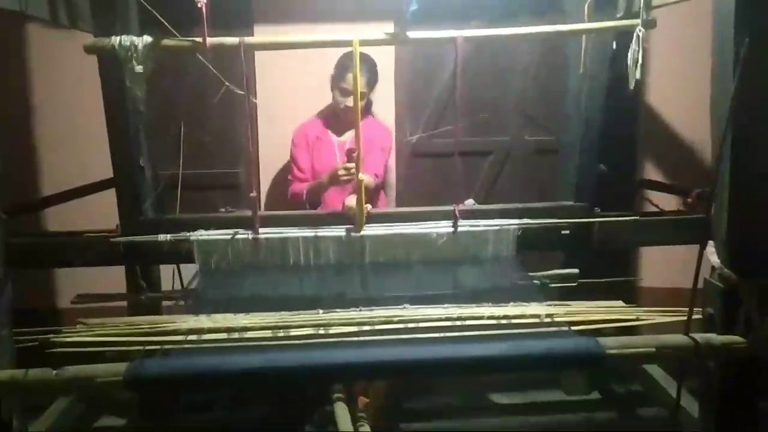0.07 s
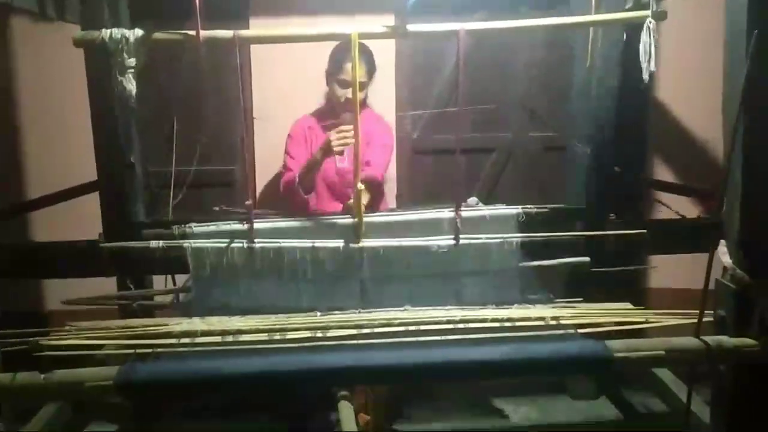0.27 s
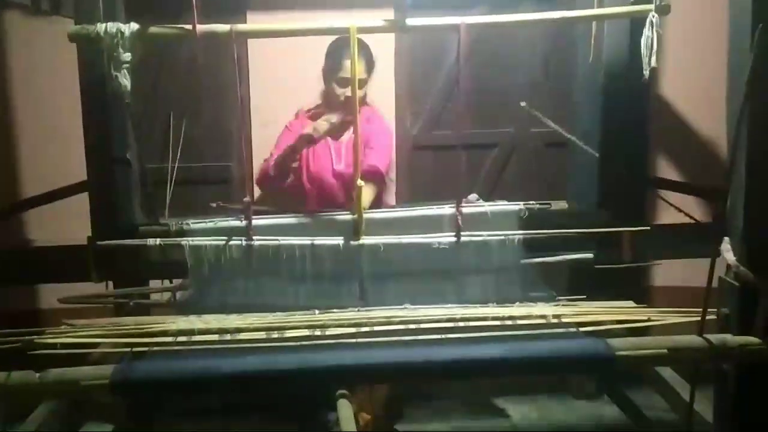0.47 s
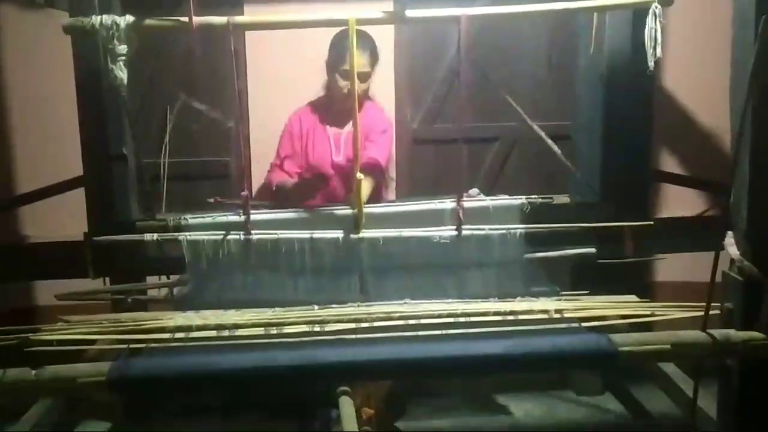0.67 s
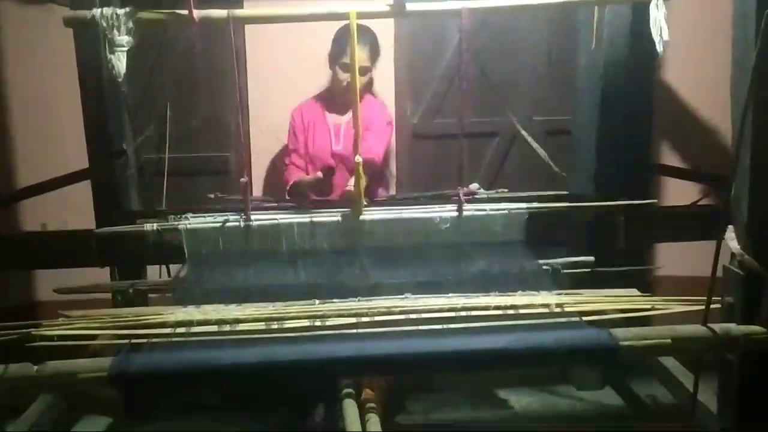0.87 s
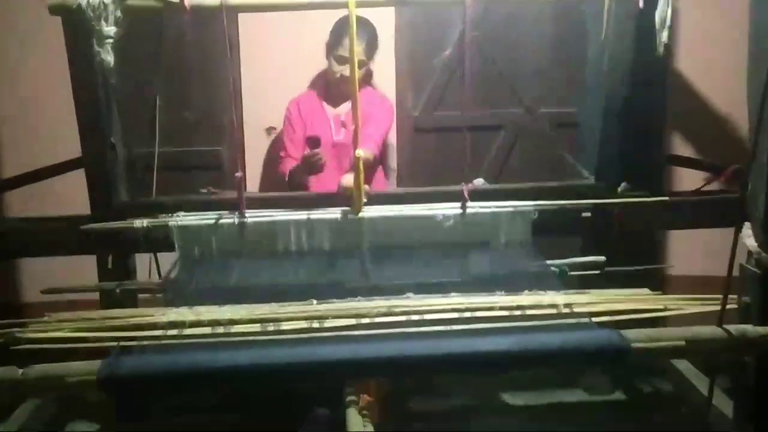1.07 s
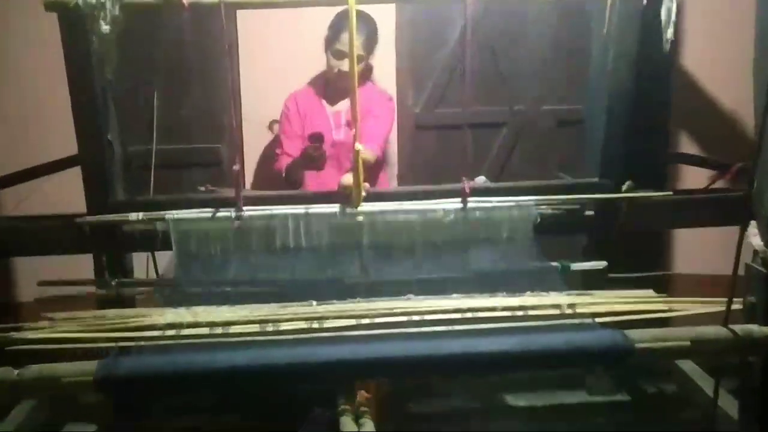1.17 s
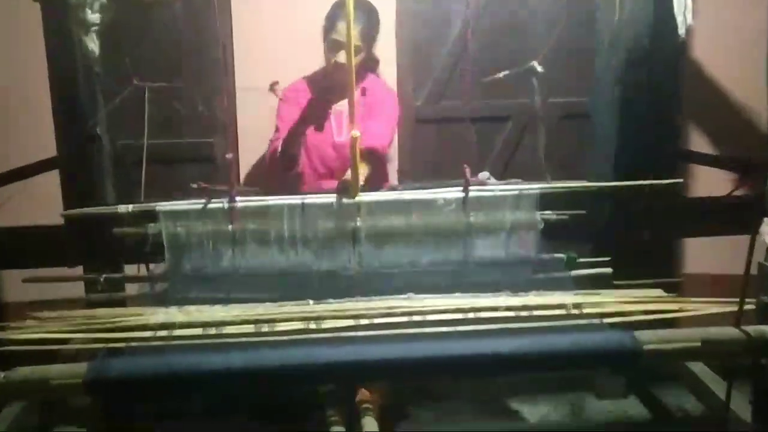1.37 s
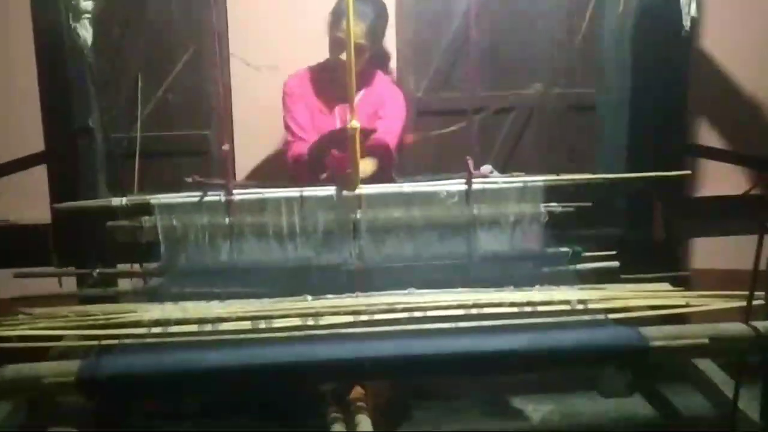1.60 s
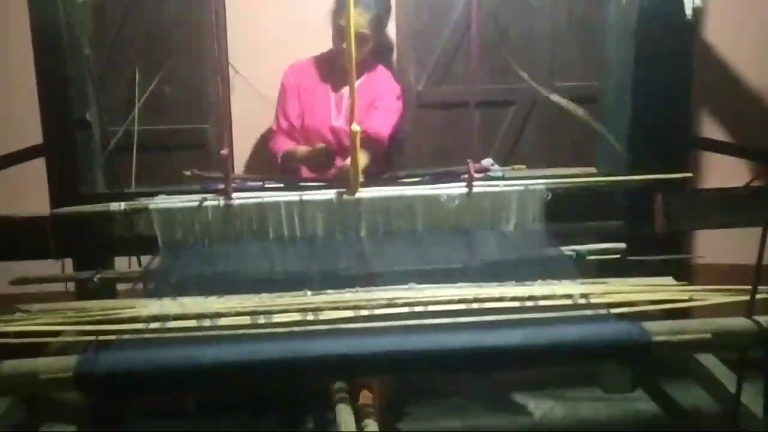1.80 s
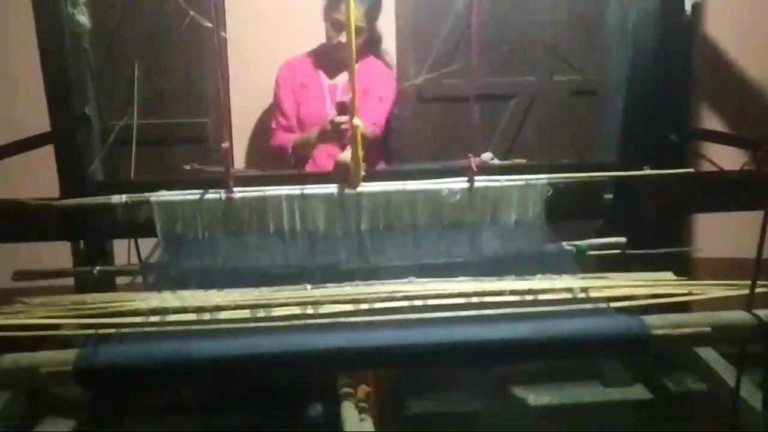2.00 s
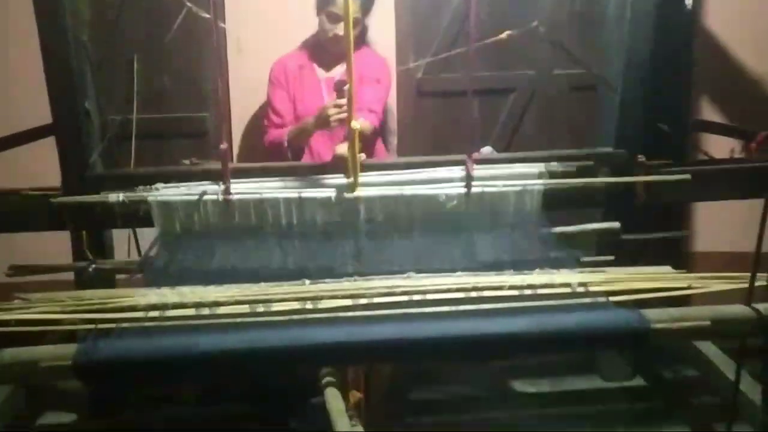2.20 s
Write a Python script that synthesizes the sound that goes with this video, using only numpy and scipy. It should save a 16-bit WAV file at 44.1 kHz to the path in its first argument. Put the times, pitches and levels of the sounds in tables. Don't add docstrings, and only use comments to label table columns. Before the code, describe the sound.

A wooden handloom in a hard room, heard a few metres away. Faint scraping leads to the loudest shuttle slam at 0.24 s, with pegs rattling after. Soft bumps and knocks cluster at 0.48-0.65, then light ticks near 0.85-1.05. A sharp far slam lands at 1.3, a faint snap at 1.46, a heavy beat at 1.6 with rebounds to 1.73, and bouncing knocks and sliding at 1.82-2.04. Quiet air and low rumble continue underneath.

```python
import sys
import numpy as np
from scipy import signal
from scipy.fft import rfft
from scipy.io import wavfile
from scipy.ndimage import uniform_filter1d

SR = 44100
rng = np.random.default_rng(int(sys.argv[2]) if len(sys.argv) > 2 else 0)


def store_pcm(level_fs):
    pcm = np.round(np.clip(level_fs, -1, 1) * 32767).astype(np.int16)
    wavfile.write(sys.argv[1], SR, np.atleast_2d(pcm).T)


def invert_db(level):
    return 10 ** (np.asarray(level, dtype=float) / 20)


N = 99225
LEAD = 4410
BINS_HZ = np.fft.rfftfreq(4096, 1 / SR)


def evened(x):
    return x / np.sqrt(np.sum(x ** 2) + 1e-20)


def read(points, hz):
    f, value = np.transpose(points)
    return np.interp(np.log(hz + 1), np.log(f + 1), value)


def panned(sound, left_db, right_db=0.0):
    return sound * invert_db(np.array([[left_db], [right_db]]))


def add(mix, s, sound):
    part = mix[:, LEAD + round(s * SR):][:, :sound.shape[1]]
    part += sound[:, :part.shape[1]]


def causal(db):
    log = np.log(invert_db(np.maximum(db, -100)))
    mirrored = np.r_[log, log[-2:0:-1]]
    return np.fft.ifft(np.exp(np.conj(signal.hilbert(mirrored)))).real[:2048]


def pair(shape_db, size):
    # frequency in Hz, left-right likeness from -1 to 1
    likeness = [(60, 0.62), (180, 1), (550, 1), (1650, 0.086), (4970, -0.14), (15000, 0.0025)]
    hz = np.fft.rfftfreq(size, 1 / SR)
    a, b, c, d = rng.standard_normal((4,) + shape_db.shape)
    same = np.clip(read(likeness, hz), -1, 1)[:, None]
    left = a + 1j * b
    right = same * left + np.sqrt(1 - same ** 2) * (c + 1j * d)
    z = np.array([left, right]) * invert_db(shape_db)
    return signal.istft(z, nperseg=size, noverlap=size * 3 // 4)[1]


def room(x):
    # frequency in Hz, time to fall 60 dB in seconds
    decay = [(150, 0.76), (400, 0.57), (1000, 0.51), (2800, 0.43), (7000, 0.3), (14000, 0.35)]
    build_s, direct_db = 0.00073, -11
    early_db, early_s = -5.5, 0.0039
    t = (np.arange(440) - 8) * 64 / SR
    t60 = read(decay, np.fft.rfftfreq(256, 1 / SR))[:, None]
    tail = pair(-60 * t / t60, size=256)[:, 512:]
    u = np.arange(tail.shape[1]) / SR
    tail = tail * (1 - np.exp(-u / build_s)) * (1 + invert_db(early_db) * np.exp(-u / early_s))
    tail = tail / np.linalg.norm(tail, axis=1)[:, None]
    wet = signal.fftconvolve(x, tail, axes=1)
    return wet[:, :x.shape[1]] + invert_db(direct_db) * x


def blow(row, tone, modes, contact_s):
    s, db, body_db, treble_db, pan_db = row
    detune, body_hz, treble_hz, evening, loud_db = 0.029, 1660, 5860, 0.69, 26
    hz = BINS_HZ
    t = np.arange(2048) / SR
    crunch = rng.standard_normal(2048) * np.exp(-t / contact_s)
    ripple = abs(rfft(evened(crunch), 4096))
    gain = np.ones(len(hz))
    for (f_hz, mode_db, t60), r in zip(modes, rng.standard_normal(len(modes))):
        off_hz = hz - f_hz * (1 + detune * r)
        gain = gain + invert_db(mode_db) / np.sqrt(1 + (off_hz * t60 / 0.52) ** 2)
    body = body_db / (1 + (hz / body_hz) ** 4)
    treble = treble_db / (1 + (treble_hz / (hz + 1)) ** 4) / (1 + (hz / treble_hz / 2) ** 10)
    colour_db = read(tone, hz) + 20 * np.log10(gain / (ripple + evening)) + body + treble
    sound = evened(np.convolve(crunch, causal(colour_db)))
    return s, panned(sound * invert_db(db + loud_db), pan_db)


def strike(places, rows, tone, modes, contact_s):
    for k, row in enumerate(rows):
        add(places[k % 4], *blow(row, tone, modes, contact_s))


def shuttle(places):
    # start in seconds, peak in dB, low body in dB, treble in dB, left over right in dB
    slams = [
        (0.233, -7, -16.5, 13, -4.5),
        (0.2375, 1, 6.5, 12.5, -6.5),
    ]
    bounces = [
        (0.597, -27, 11, -7, 1),
        (1.848, -15.5, 10, -11, -5.5),
        (1.8875, -13, 4, -1.5, -4),
    ]
    touch = [
        (0.2112, -9, 1.5, 0, -6.5),
    ]
    far_slams = [
        (1.2935, -29, 1, 14, 9.5),
        (1.297, -6.5, 3, 7.5, -8),
    ]
    # frequency in Hz, level in dB
    wood_tone = [(35, -58), (60, -31), (305, -22.5), (368, -24.5), (869, -6), (3270, 0), (3930, 0.5),
                 (9740, -15.5), (15500, -29)]
    # mode in Hz, level over the crunch in dB, time to fall 60 dB in seconds
    slam_modes = [(392, 12.5, 0.059), (879, 1, 0.16), (2940, 1.5, 0.027), (3900, 1.5, 0.0051),
                  (4500, 0.5, 0.0047)]
    bounce_modes = [(2650, 5.5, 0.04), (3780, 10.5, 0.0088), (4970, 6.5, 0.0041)]
    touch_modes = [(1050, 6, 0.017), (1680, 8, 0.0086), (2590, 8, 0.026)]
    far_modes = [(920, -2, 0.044), (4200, 6.5, 0.0034), (7100, -17, 0.012)]
    strike(places, slams, wood_tone, slam_modes, contact_s=0.002)
    strike(places, bounces, wood_tone, bounce_modes, contact_s=0.002)
    strike(places, touch, wood_tone, touch_modes, contact_s=0.002)
    strike(places, far_slams, wood_tone, far_modes, contact_s=0.002)


def beater(places):
    # start in seconds, peak in dB, low body in dB, treble in dB, left over right in dB
    knocks = [(0.559, -20, 1, -10, -2.5), (0.562, -15, 17, 0.5, -6.5), (0.588, -13.5, 0, -17.5, -17),
              (0.605, -23.5, -1, 9, -4.5), (0.624, -30, -6, 17, -11), (1.202, -26, 7.5, -15, -6.5),
              (1.231, -28, 5.5, -0.5, -8.5), (1.546, -23, 7, -4, -3), (1.581, -14.5, 6.5, -15, -5.5),
              (1.623, -19.5, 5, 0, -3), (1.939, -18, 7.5, 0.5, -9),
              (-0.035, -14, 0.0043, 0.012, -7),
    ]
    beats = [
        (1.5925, -13, 1, 11, -4),
        (1.5965, -7, 0.5, -1, -5),
        (1.651, -28, 25, -12, -8),
        (1.679, -19.5, 3.5, 1, -3),
        (1.723, -18.5, 5.5, 6, -6.5),
    ]
    # frequency in Hz, level in dB
    beater_tone = [(35, -64), (60, -33.5), (335, -16), (497, -18), (1050, -2.5), (2310, -3), (3670, -0.5),
                   (9080, -7.5), (15500, -28.5)]
    # mode in Hz, level over the crunch in dB, time to fall 60 dB in seconds
    knock_modes = [(813, 2.2, 0.034), (1038, 0.83, 0.19), (3924, 0.71, 0.18), (4740, 1.4, .01)]
    beat_modes = [(1000, 0, 0.023), (1193, 0.5, 0.012), (2950, -6, 0.022), (4200, 1.5, 0.0045)]
    strike(places, knocks, beater_tone, knock_modes, contact_s=0.003)
    strike(places, beats, beater_tone, beat_modes, contact_s=0.003)


def treadles(places):
    # start in seconds, peak in dB, low body in dB, treble in dB, left over right in dB
    bumps = [(0.475, -28, -3.5, 15, -3), (0.488, -25, -8, 15, -8), (0.496, -23, -16.5, 13, -3.5),
             (1.816, -24.5, -14, 9, -6), (1.828, -22.5, -7.5, 22, -2), (2.019, -33.5, -10, 0, -4),
             (2.032, -30, 32, 4, -5.5)]
    # frequency in Hz, level in dB
    bump_tone = [(59, -21), (100, -15.5), (564, -8), (808, 1.5), (1690, -3), (3000, -2.5), (6000, -22),
                 (9150, -49), (15500, -37)]
    # mode in Hz, level over the crunch in dB, time to fall 60 dB in seconds
    bump_modes = [(423, 12, 0.01), (810, 5.5, 0.068)]
    strike(places, bumps, bump_tone, bump_modes, contact_s=0.004)


def rods_and_cords(places):
    # start in seconds, peak in dB, low body in dB, treble in dB, left over right in dB
    ticks = [(.187, -46, 1, 2, -3), (.72, -53, -2, -7, -18), (.832, -40, -17, 12, -14),
             (.865, -33, -8.5, 12.5, -7), (1.0, -39, -24, -5, -9), (1.042, -37, 7, 13, -7),
             (1.047, -28, -7, 10.5, -8), (1.065, -38, -13, 6, -22), (1.277, -27, -4, 0, -5)]
    snaps = [
        (1.44, -31, 0, -4, -19),
        (1.4585, -23, 4, -23, -7),
        (1.473, -30, -4, -7, -9),
    ]
    # frequency in Hz, level in dB
    tick_tone = [(120, -43), (200, -40), (940, -2), (1350, -7.5), (1480, -16.5), (2090, -7), (5490, -11),
                 (15500, -28)]
    snap_tone = [(180, -43), (300, -26), (953, -28), (2880, -11), (4650, 14.5), (9450, 15), (15500, -8)]
    # mode in Hz, level over the crunch in dB, time to fall 60 dB in seconds
    tick_modes = [(1569, 29, 0.22), (4330, 3, 0.02), (5480, 1.9, 0.043)]
    snap_modes = [(9430, 22, 0.002)]
    strike(places, ticks, tick_tone, tick_modes, contact_s=0.003)
    strike(places, snaps, snap_tone, snap_modes, contact_s=0.002)


def loom():
    places = np.zeros((4, 2, N + LEAD))
    shuttle(places)
    beater(places)
    treadles(places)
    rods_and_cords(places)
    return sum(room(p) for p in places)[:, LEAD:]


def rattles():
    # start in seconds, peak in dB, pitch in Hz, time to fall 60 dB in seconds
    rings = [(0.211, -33, 2590, 0.045), (0.2367, -5, 4210, 0.03), (0.25, -5, 4200, 0.016),
             (0.255, -11, 2830, 0.022), (0.261, -17, 4300, .025), (0.282, -23, 3970, 0.025),
             (0.298, -14.5, 3980, 0.037), (0.309, -13, 3900, .03), (.320, -14, 4080, .03),
             (.327, -17, 4030, 0.025), (0.5603, -19.5, 4800, 0.033), (0.569, -20, 990, 0.036),
             (.589, -19, 4900, .02), (.593, -20.5, 790, 0.033), (0.5972, -13.5, 3747, 0.048),
             (.616, -17.5, 3520, 0.053), (0.655, -20, 3880, 0.031), (1.299, -11, 4190, 0.018),
             (1.324, -12, 4200, 0.016), (1.6, -12.5, 2950, .02), (1.610, -20, 1050, 0.034),
             (1.652, -7, 1050, 0.034), (1.683, -18.5, 4200, 0.044), (1.730, -24, 1100, .04),
             (1.745, -25.5, 1164, 0.034), (1.848, -17, 3630, 0.045), (1.848, -24, 918, 0.063),
             (1.8855, -9.5, 4200, .012), (1.889, -22.5, 3810, 0.093), (1.887, -27, 2650, 0.042),
             (1.924, -17, 3160, 0.033), (1.943, -22, 1384, 0.036), (1.905, -21, 3680, 0.05),
             (2.022, -26, 790, 0.037), (2.040, -23, 870, 0.069)]
    split, rise_s, left_db, room_db = 0.068, 0.0002, -11, -14
    out = np.zeros((2, N + LEAD))
    t = np.arange(4000) / SR
    for s, db, hz, t60 in rings:
        offset, phase = rng.random(2)
        second_hz = hz * (1 + split * (2 * offset - 1))
        ring = np.sin(2 * np.pi * hz * t) + 0.54 * np.sin(2 * np.pi * (second_hz * t + phase))
        ring = ring * invert_db(db - 60 * t / t60) * (1 - np.exp(-t / rise_s))
        add(out, s, panned(ring, left_db))
    return (out + invert_db(room_db) * room(out))[:, LEAD:]


def thumps():
    # start in seconds, level in dB, pitch in Hz
    rings = [(0.241, -45, 75), (0.239, -30, 180), (0.562, -37, 103), (0.652, -40, 66), (1.595, -59, 61),
             (1.852, -38.5, 184), (1.902, -35.5, 61), (1.943, -41, 97)]
    t60, rise_s = 0.16, 0.00092
    out = np.zeros((2, N + LEAD))
    t = np.arange(SR // 3) / SR
    for s, db, hz in rings:
        ring = np.sin(2 * np.pi * hz * t) * invert_db(db - 60 * t / t60) * (1 - np.exp(-t / rise_s))
        add(out, s, panned(ring, -5.0))
    return out[:, LEAD:]


def slide():
    # time in seconds, level in dB
    stroke = [(0, -41.5), (.465, -47), (.495, -32), (0.539, -40.5), (.63, -32), (.75, -47), (.88, -42.5),
              (.97, -54.5), (1.079, -39), (1.17, -93), (1.26, -62), (1.45, -46), (1.57, -42.5),
              (1.805, -46), (1.84, -28), (1.93, -35), (2.101, -36.5), (2.25, -52)]
    # frequency in Hz, level in dB
    scrape_tone = [(59, -80), (100, -10), (275, -9.5), (1040, -14.5), (2000, -13.5), (3120, -9.5),
                   (4660, -5), (10200, -11.5), (15500, -34.5)]
    slips_per_s = 1100
    happens = rng.random(N) < slips_per_s / SR
    strength = invert_db(np.minimum(3.5 * rng.exponential(1, N), 10))
    slips = happens * strength * rng.choice([-1., 1.], N)
    sound = signal.oaconvolve(slips, causal(read(scrape_tone, BINS_HZ)))[:N]
    s, db = np.transpose(stroke)
    sound = evened(sound) * np.sqrt(N) * invert_db(np.interp(np.arange(N) / SR, s, db))
    return room(panned(sound, -6.0))


def air():
    # frequency in Hz, level in dB
    air_tone = [(12, -26), (20, 7), (76, 8), (581, -31), (881, 0), (1300, -45), (1450, -15), (4430, -15),
                (15500, -20.5)]
    air_db, rumble_hz, rumble_db = -56.5, 63.1, -58
    shape_db = read(air_tone, np.fft.rfftfreq(2048, 1 / SR))[:, None] + np.zeros(N // 512 + 5)
    noise = pair(shape_db, size=2048)[:, :N]
    drift_hz = 300 * uniform_filter1d(rng.standard_normal(N), 3000)
    turns = np.cumsum(rumble_hz + drift_hz) / SR
    rumble = invert_db(rumble_db) * np.sin(2 * np.pi * turns)
    return panned(evened(noise) * np.sqrt(2 * N) * invert_db(air_db) + rumble, -2.5, 1.5)


def scene():
    return loom() + rattles() + thumps() + slide() + air()


def capsule(x):
    shelf_db, edge_hz, bass_cut_hz = 2.5, 11000, 32
    treble = shelf_db / (1 + (edge_hz / (BINS_HZ + 1)) ** 16)
    bass = -30 / (1 + (BINS_HZ / bass_cut_hz) ** 4)
    return signal.oaconvolve(x, causal(treble + bass)[None], axes=1)[:, :N]


def low_pass(x):
    return signal.sosfilt(signal.butter(12, 15660, fs=SR, output="sos"), x)


def record(dry):
    # frequency in Hz, left port colour in dB
    port_tone = [(100, -0.5), (1000, 2), (3000, -1), (8000, -4), (11000, -7.5), (12500, -25), (15000, -8.5)]
    lag = np.zeros(9)
    left = signal.oaconvolve(dry[0], np.r_[lag, causal(read(port_tone, BINS_HZ))])[:N]
    limited = 0.9 * np.tanh(np.array([left, dry[1]]) / 0.9)
    return low_pass(capsule(limited))


dry = scene()
out = record(dry)
store_pcm(out)
```